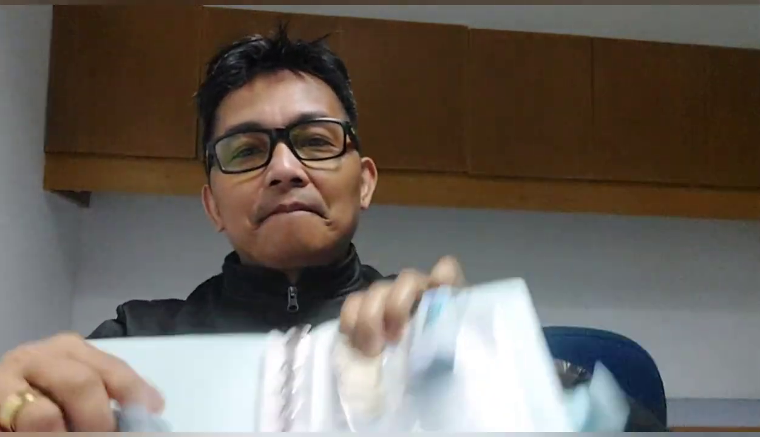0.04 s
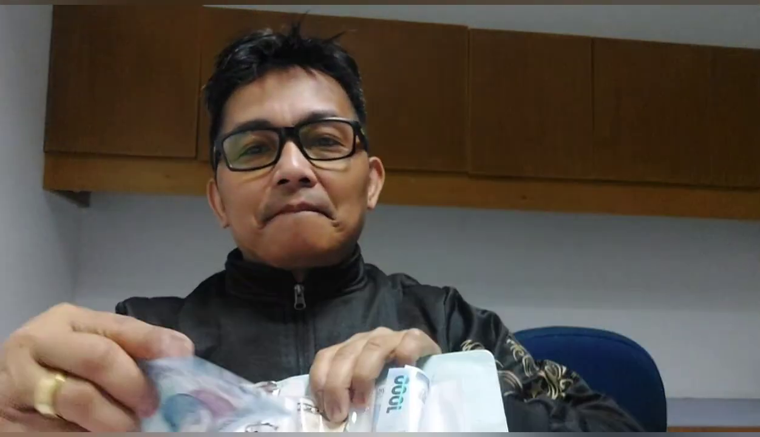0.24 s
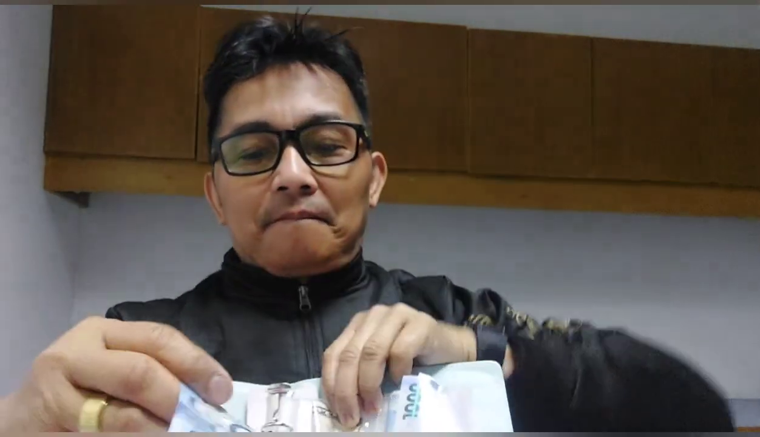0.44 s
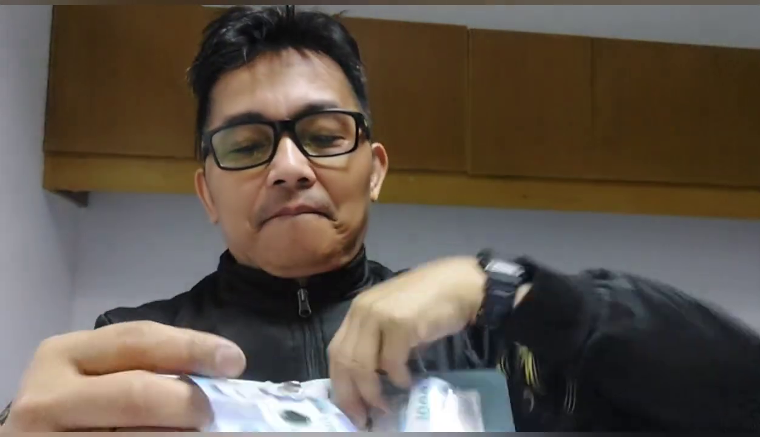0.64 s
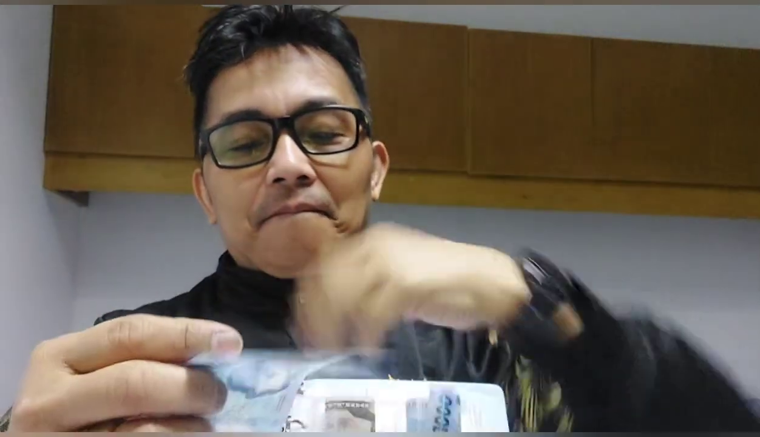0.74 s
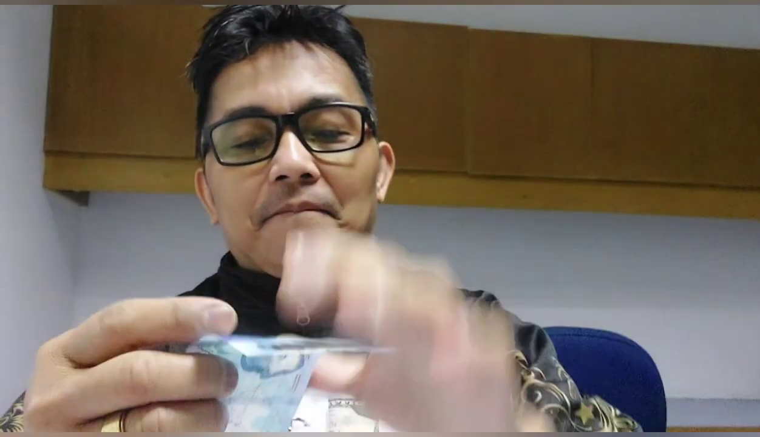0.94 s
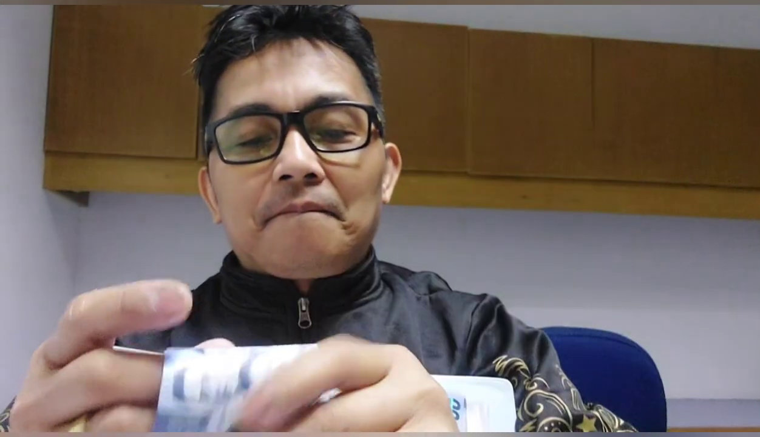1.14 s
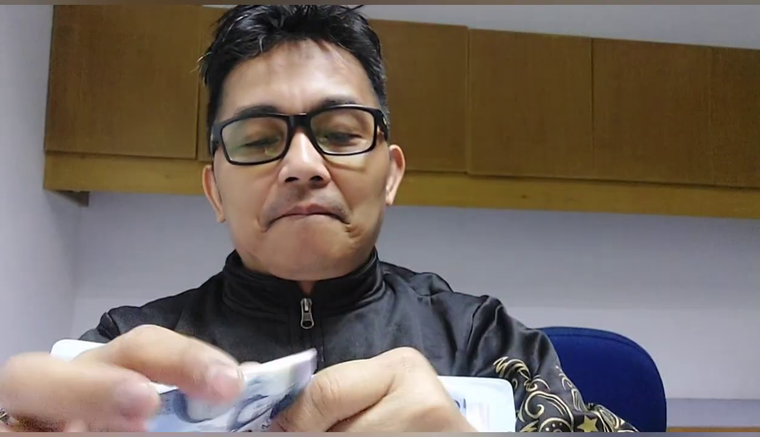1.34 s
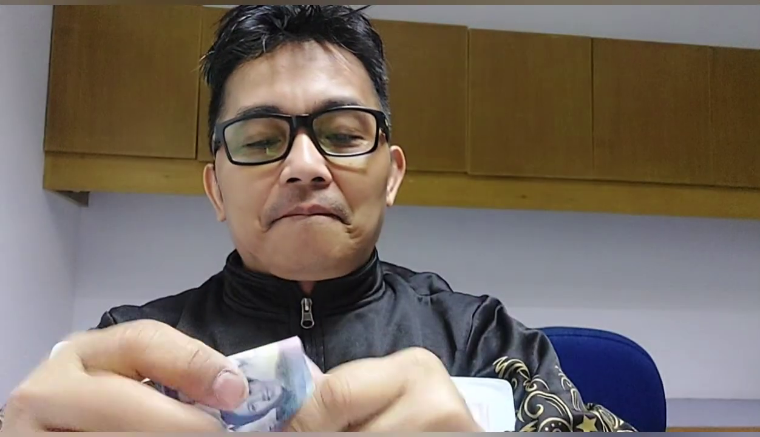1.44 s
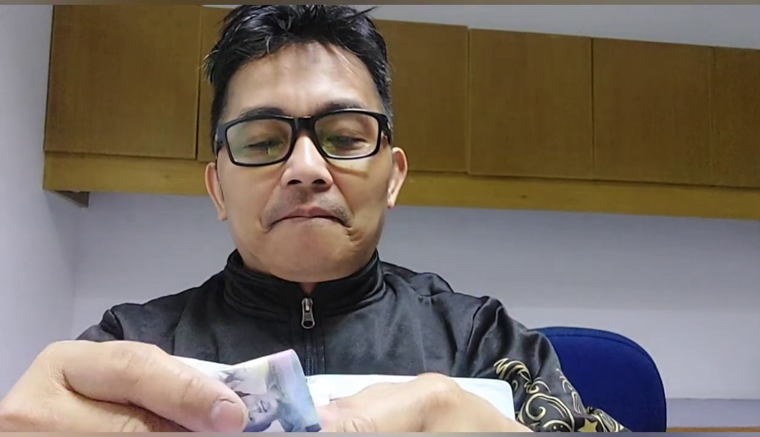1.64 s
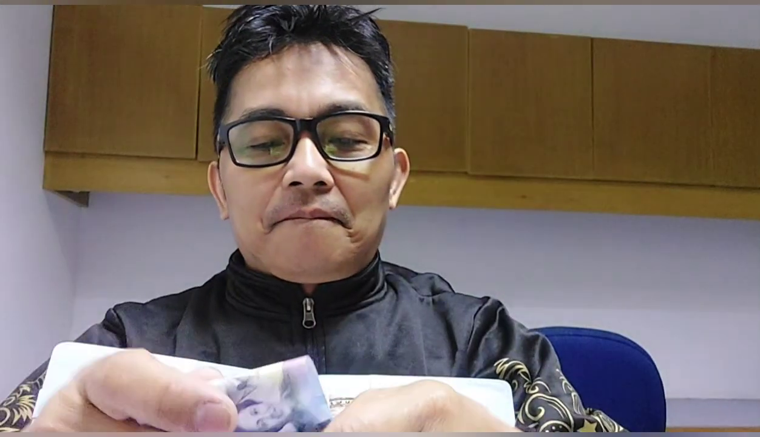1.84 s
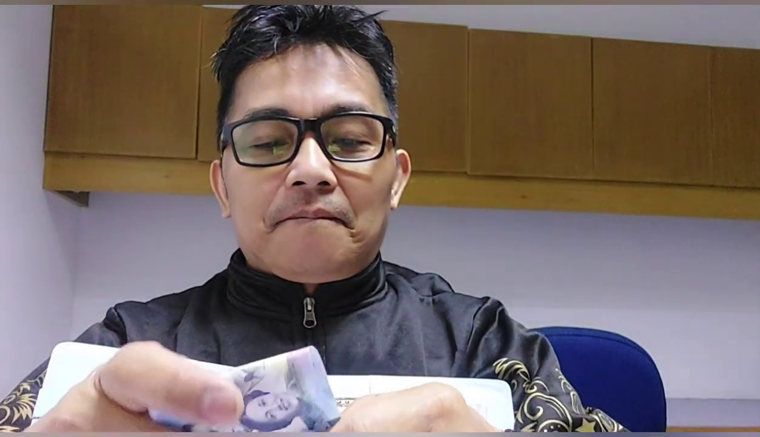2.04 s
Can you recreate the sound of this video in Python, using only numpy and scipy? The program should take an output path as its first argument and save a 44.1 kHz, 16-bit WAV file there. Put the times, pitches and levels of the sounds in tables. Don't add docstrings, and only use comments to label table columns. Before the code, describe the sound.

A paper banknote crinkles and snaps close to a stereo microphone in a small room, after a quick rub of plastic binder pockets and a soft low desk boom; faint rumble and fan tone underneath.

```python
import sys
import numpy as np
from scipy import signal
from scipy.fft import rfft, irfft
from scipy.io import wavfile
from scipy.ndimage import uniform_filter1d

SR = 44100
rng = np.random.default_rng(int(sys.argv[2]) if len(sys.argv) > 2 else 0)


def dump(signal):
    limited = np.clip(np.atleast_2d(signal).T, -1, 1)
    pcm = np.round(limited * 32767).astype(np.int16)
    wavfile.write(sys.argv[1], SR, pcm)


def natural_amplitude(level_db):
    exponent = np.asarray(level_db, float) / 20
    return 10 ** exponent


N = 92610
LIFT_S = 1.0


def evened(x):
    return x / np.sqrt(np.mean(x ** 2) + 1e-20)


def peaked(x):
    return x / abs(x).max(axis=1, keepdims=True) * np.array([[1], [0.6]])


def colour(x, points):
    f_hz, db = np.transpose(points)
    grid_hz = np.fft.rfftfreq(8192, 1 / SR)
    log_gain = np.interp(np.log(grid_hz + 1), np.log(f_hz), db) * np.log(10) / 20
    fold = np.r_[1, 2 * np.ones(4095), 1, np.zeros(4095)]
    impulse = irfft(np.exp(rfft(irfft(log_gain) * fold)))
    return signal.fftconvolve(x, impulse[None], axes=1)[:, :x.shape[1]]


def ring(x, hz, width_hz):
    r = np.exp(-np.pi * width_hz / SR)
    return signal.lfilter([1, 0, -1], [1, -2 * r * np.cos(2 * np.pi * hz / SR), r * r], x)


def add(mix, s, sound):
    part = mix[:, round(s * SR):][:, :sound.shape[1]]
    part += sound[:, :part.shape[1]]


def grains(per_s, spread_db, smooth):
    size = natural_amplitude(spread_db * np.minimum(rng.exponential(1, N), 4))
    size = size * (rng.random(N) < per_s / SR)
    slips = evened(size * rng.standard_normal((2, N)))
    return evened(slips + smooth * rng.standard_normal((2, N)))


def flutter(width_s, depth_db):
    size = max(round(width_s * SR), 1)
    wobble = uniform_filter1d(uniform_filter1d(rng.standard_normal(N), size), size)
    return natural_amplitude(depth_db * evened(wobble))


# peak t/s, rise/s, fall/s, paper level/dB, film level/dB
STROKES = [(.0, 0.011, 0.018, -45, -49), (.134, 0.015, 0.017, -47, -70), (.117, 0.026, 0.032, -61.5, -49.5),
           (0.222, 0.011, 0.028, -43.5, -48.5), (0.341, 0.02, 0.049, -57.5, -64),
           (.385, 0.029, 0.022, -82, -62.5), (.45, 0.042, 0.041, -66, -79),
           (0.541, 0.057, 0.045, -59, -55.5), (0.643, 0.02, 0.12, -56.5, -57.5),
           (0.737, 0.016, 0.027, -52, -60), (.77, 0.024, 0.018, -45, -56),
           (1.116, 0.013, 0.058, -50.5, -54), (1.223, 0.024, 0.063, -49.5, -49.5),
           (1.339, 0.023, 0.053, -41, -39), (1.376, 0.017, 0.013, -37.5, -37),
           (1.478, 0.0099, 0.012, -45.5, -59), (1.49, 0.014, 0.011, -46, -49),
           (1.531, 0.021, 0.03, -47.5, -47.5), (1.555, 0.01, 0.011, -93, -53.5),
           (1.8, 0.036, 0.025, -57.5, -57), (1.849, 0.031, 0.056, -50.5, -73),
           (2.02, 0.036, 0.048, -59, -60.5)]
# f/Hz, level/dB
BINDER_COLOUR = [(200, -29.5), (400, 11), (800, 1), (1800, 5), (5200, -3), (9000, -18), (16000, -15)]
# start t/s, end t/s
TAUT_SPANS = [
    (1.28, 1.44),
    (1.6, 2.1),
]
# f/Hz, width/Hz, level/dB
TAUT_RINGS = [(2400, 260, 3), (2920, 140, -6), (1200, 140, -5)]


def rubbing():
    t = np.arange(N) / SR
    paper_level, film_level = 0, 0
    for peak_s, rise_s, fall_s, paper_db, film_db in STROKES:
        attack = np.exp(-((peak_s - t) / rise_s) ** 2)
        decay = np.exp(-abs(t - peak_s) / fall_s)
        shape = np.where(t < peak_s, attack, decay)
        paper_level = paper_level + natural_amplitude(paper_db) * shape
        film_level = film_level + natural_amplitude(film_db) * shape

    slips = grains(6000, 2.1, 1.0)
    on_binder = t < LIFT_S
    sheet = np.where(on_binder, evened(colour(slips, BINDER_COLOUR)), paper(slips))
    sheet = sheet + natural_amplitude(1.5 - 6.7 * on_binder) * crinkles()

    taut = sum((t > start) & (t < end) for start, end in TAUT_SPANS)
    skin = evened(sum(natural_amplitude(db) * evened(ring(slips, hz, width_hz)) for hz, width_hz, db in TAUT_RINGS))
    tight_sheet = evened(sheet + natural_amplitude(1.5) * skin + natural_amplitude(5.0) * pinched(sheet))
    sheet = np.where(taut, tight_sheet, sheet)

    hiss = evened(film(grains(8000, 0.66, 1.0)))
    return paper_level * sheet * flutter(0.002, 2.0) / 1.392 + film_level * flutter(0.0084, 2.8) * hiss


# t/s, peak level/dB, ring f/Hz, film level/dB, burst length/s
SNAPS = [(0.206, -33, 4650, -9.5, 0.0031), (0.2135, -39, 5270, -8, 0.0045),
         (0.23, -32.5, 5360, -11, 0.0038), (0.3263, -54, 1910, 6, 0.0022), (0.333, -52.5, 1180, 2.5, 0.011),
         (0.697, -38, 5450, -27, 0.001), (0.7268, -36.5, 3900, -9, 0.0065), (0.733, -53, 3400, -2, 0.002),
         (0.7514, -28.5, 3370, -6, 0.0015), (0.7532, -27.5, 3280, 1.5, 0.00041),
         (0.7549, -39, 2900, -3.5, 0.0022), (0.8457, -42.5, 5200, -26, 0.0021),
         (0.971, -56.5, 5300, -12, 0.0047), (1.086, -39, 1670, -25, 0.003),
         (1.1068, -38, 1730, -12.5, 0.0076), (1.132, -37.5, 1390, -37, 0.006),
         (1.2414, -26.5, 2400, -21.5, 0.0026), (1.3066, -38.5, 1590, -32, 0.0052),
         (1.334, -42, 3030, 2, 0.0054), (1.3442, -35.5, 2900, -16, 0.0049),
         (1.348, -35.5, 1170, -27, 0.0033), (1.37, -38, 1300, -25, 0.0042),
         (1.3732, -30.5, 2840, -7.5, 0.003), (1.3759, -33, 2850, 3.5, 0.002),
         (1.4586, -25.5, 1420, -33, 0.0023), (1.4628, -21, 1500, -22, 0.003),
         (1.4638, -19.5, 3140, -29, 0.0026), (1.4634, -26.5, 6800, -21, 0.0024),
         (1.467, -39, 3700, -18, 0.0016), (1.4905, -44.5, 1670, 1, 0.0048),
         (1.5115, -23, 1680, -31, 0.0024), (1.5135, -27, 2920, -30, 0.003),
         (1.5245, -35.5, 2880, -8.5, 0.0015), (1.7618, -43.5, 1290, -25, 0.0018),
         (1.7623, -43, 3270, -29, 0.0045), (1.826, -41, 1500, -40, 0.0022),
         (1.8278, -28.5, 2900, -43, 0.0049), (1.8318, -33, 3950, -32, 0.0037),
         (1.849, -44, 2770, -34, 0.005), (1.2416, -33, 5150, -22, 0.0043)]


def snaps():
    snap_q, tick_q, thud_hz = 1.5, 4.5, 493
    out, t = np.zeros((2, N)), np.arange(2048) / SR
    for s, db, hz, film_db, length_s in SNAPS:
        sheet_noise, film_noise = rng.standard_normal((2, 2, len(t)))
        burst = np.minimum(t / 0.00039, 1) * np.exp(-(t / length_s) ** 2)
        sheet_burst, film_burst = sheet_noise * burst, film_noise * burst
        tick = hz > 4300
        tick_width_hz = hz / tick_q
        if tick:
            body = ring(ring(sheet_burst, hz, tick_width_hz), hz, tick_width_hz * 2)
        else:
            sheet = colour(sheet_burst, PAPER_COLOUR) if s < LIFT_S else paper(sheet_burst)
            body = ring(sheet, hz, hz / snap_q)
        low = peaked(peaked(body) + natural_amplitude(-7) * peaked(ring(body, hz, tick_width_hz)))
        if not tick:
            thud = ring(ring(film_burst, thud_hz, 370), thud_hz, 590)
            low = low + natural_amplitude(-21 + 0.085 * (db + 19)) * peaked(thud)
        add(out, s, natural_amplitude(db) * (low + natural_amplitude(film_db + 14.0) * peaked(film(film_burst))))
    return out


# f/Hz, level/dB
PAPER_COLOUR = [(300, 13.5), (1000, 0), (1350, 10.5), (3000, 4), (4100, 0.5), (9400, -24), (12100, -9),
                (16000, -51)]
# f/Hz, width/Hz, level/dB
NOTE_PANELS = [(1420, 900, 7), (1649, 83, 1), (2270, 110, 3), (3065, 82, 4), (3574, 1500, 4.5),
               (4830, 170, 7), (6800, 140, 5.5)]


def paper(x):
    panels = 0
    for k, (hz, width_hz, db) in enumerate(NOTE_PANELS):
        panels = panels + (-1) ** k * natural_amplitude(db) * np.sqrt(width_hz) * ring(x, hz, width_hz)
    return evened(evened(colour(x, PAPER_COLOUR)) + natural_amplitude(-5) * evened(panels))


def crinkles():
    out = 0
    for hz, width_hz, db in NOTE_PANELS + NOTE_PANELS:
        hz = hz * (1 + 0.26 * rng.uniform(-0.44, 0.57))
        pops = grains(400, 3.0, 0.35)
        out = out + natural_amplitude(db) * evened(ring(ring(pops, hz, 3.6 * width_hz), hz, hz / 2.9))
    return evened(out)


# f/Hz, level/dB
FILM_COLOUR = [(300, -98), (3000, -10), (6000, -7.5), (9000, -9.5), (11000, -3.5), (12500, 0.5),
               (15500, -4.5)]


def film(x):
    return colour(x, FILM_COLOUR)


# f/Hz, level/dB
PINCH_COLOUR = [(1000, -12.5), (1900, -10), (2400, -2), (2950, -2.5), (3500, -4.5), (5000, -6), (9500, -10),
                (13000, -10)]


def pinched(x):
    return evened(colour(x, PINCH_COLOUR))


# t/s, level/dB
HANDS = [(0, -56.5), (.07, -61), (.3, -57.5), (.57, -62), (.61, -72), (0.801, -63), (0.902, -72.5),
         (1.0, -69), (1.07, -58), (1.3, -57.5), (1.6, -62), (1.75, -60), (2.1, -59.5)]
# f/Hz, level/dB
TOUCH_COLOUR = [(290, -29), (500, -0.5), (1790, -6.5), (2330, -14.5), (3020, -11), (12300, -10),
                (16000, -5)]


def touch():
    (s, db), t = np.transpose(HANDS), np.arange(N) / SR
    slips = grains(9000, 2.6, 4.3)
    sheet = np.where(t < LIFT_S, evened(colour(slips, TOUCH_COLOUR)), pinched(slips))
    return natural_amplitude(np.interp(t, s, db)) * flutter(.03, 1.5) * sheet


# t/s, level/dB, f/Hz, t60/s, pitch sag share (negative rises)
KNOCKS = [(.208, -21.5, 158, 0.27, 0.27), (.208, -27.5, 197, 0.12, -0.063),
          (.21, -38.5, 361.5, 0.21, -0.044), (0.224, -31.5, 52, 0.51, -0.0053),
          (0.272, -29, 176.8, 0.18, 0.2), (.365, -38.5, 121, 0.27, 0.022),
          (.345, -33.5, 118.2, 0.32, 0.011), (0.349, -43, 63.2, 0.59, 0.038),
          (0.663, -52, 60.5, 0.28, 0.12), (0.808, -34, 66.3, 0.15, -0.12), (1.465, -35, 450, 0.036, -0.026),
          (1.511, -36.5, 119.6, 0.15, -0.048), (.26, -40, 245, 0.25, 0.025), (.335, -41, 296, 0.12, -0.04)]


def desk():
    rise_s, sag_s = 0.0017, 0.048
    out, t = np.zeros((2, N)), np.arange(SR // 2) / SR
    for s, db, hz, t60_s, sag in KNOCKS:
        pitch_hz = hz * (1 - sag * np.minimum(t / sag_s, 1))
        turns = np.cumsum(pitch_hz) / SR + np.array([[0], [.25]])
        level = natural_amplitude(db - 60 * (t / t60_s) - 60 * (t / t60_s) ** 3)
        add(out, s, level * np.minimum(t / rise_s, 1) * np.sin(2 * np.pi * turns))
    return out


def walls(x):
    t = np.arange(SR // 4) / SR
    tail_t60_s, gap_s = 0.051, .003
    tail = rng.standard_normal((2, len(t))) * natural_amplitude(-60 * t / tail_t60_s) * (t > gap_s)
    return natural_amplitude(-8.5) * signal.oaconvolve(x, tail / np.linalg.norm(tail[0]), axes=1)[:, :N]


# t/s, rumble level/dB
LEANING = [(0, -56), (.39, -54.5), (.5, -56), (0.838, -53.5), (0.968, -61), (1.22, -54), (1.6, -54.5),
           (2.1, -57)]
# f/Hz, level/dB
HUM_COLOUR = [(12, -64), (20, -42), (43, -4), (85, -3), (113, -1.5), (255, -7), (373, -10), (597, -26),
              (1500, -34.5), (1950, -38), (3300, -120)]


def room_tone():
    rumble_noise, fan_noise = rng.standard_normal((2, 2, N))
    s, db = np.transpose(LEANING)
    level = natural_amplitude(np.interp(np.arange(N) / SR, s, db + 3.0))
    hum = evened(colour(rumble_noise, HUM_COLOUR + [(6000, -62.0)]))
    fan = evened(ring(fan_noise, 120.9, 6))
    return level * flutter(0.029, 2.27) * hum + natural_amplitude(-58.5) * fan


# f/Hz, side minus mid level/dB
PORTS = [(60, -13.5), (180, -10.5), (550, -4), (1650, -3.5), (4970, 0.5), (15000, 0)]
# f/Hz, left minus right level/dB
LEAN = [(60, 2), (950, 2.5), (15000, -2.5)]


def scene():
    close = snaps()
    both = close + walls(close) + rubbing() + touch() + desk() + room_tone()
    mid, side = both[:1], colour(both[1:], PORTS)
    left = colour(mid + side, [(hz, db / 2) for hz, db in LEAN])
    right = colour(mid - side, [(hz, -db / 2) for hz, db in LEAN])
    return np.r_[left, right]


def band_limit(x):
    return signal.sosfilt(signal.butter(12, 16820, fs=SR, output="sos"), x)


def record(dry):
    x = signal.oaconvolve(dry, signal.firwin(255, 15800, fs=SR)[None], "same")
    x = signal.sosfilt(signal.butter(4, 38, "high", fs=SR, output="sos"), x)
    return band_limit(x)


dry = scene()
out = record(dry)
dump(out)
```